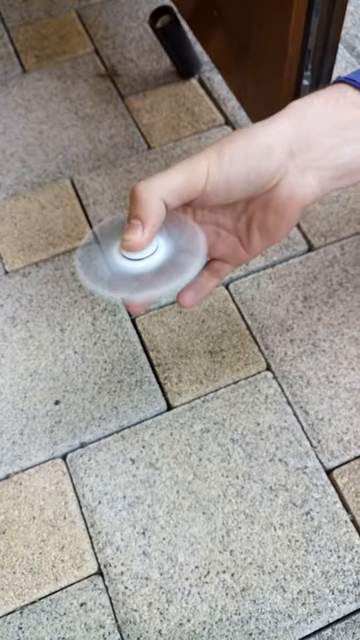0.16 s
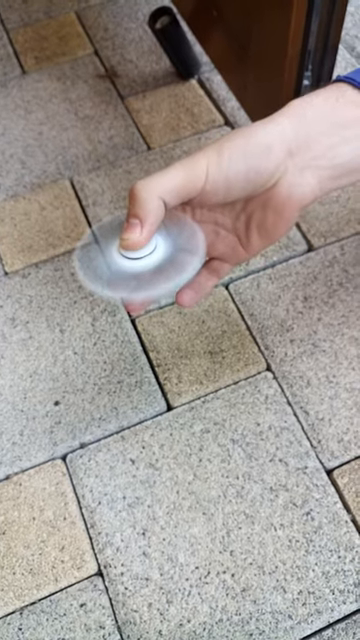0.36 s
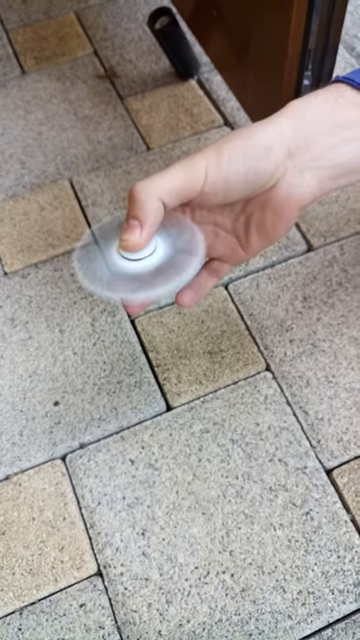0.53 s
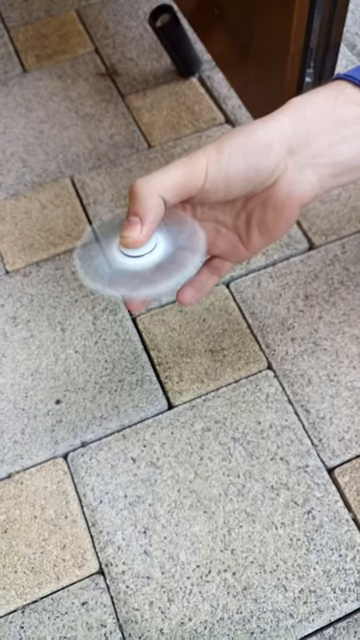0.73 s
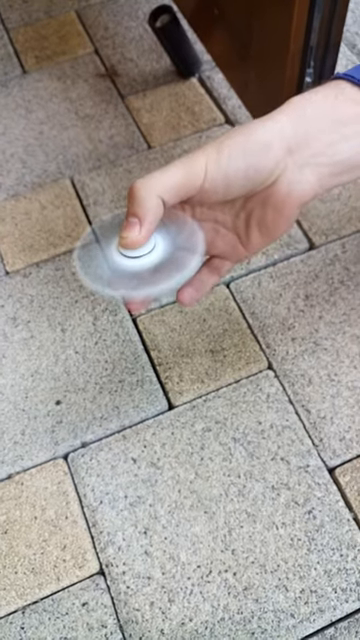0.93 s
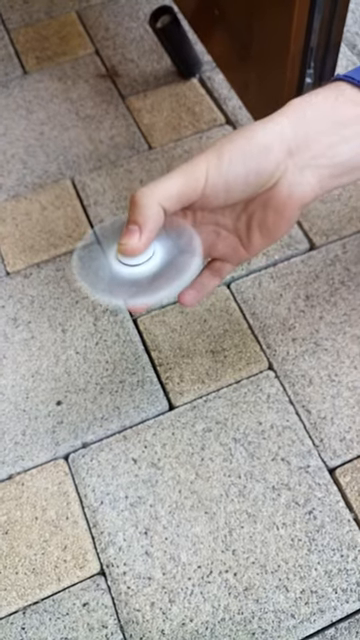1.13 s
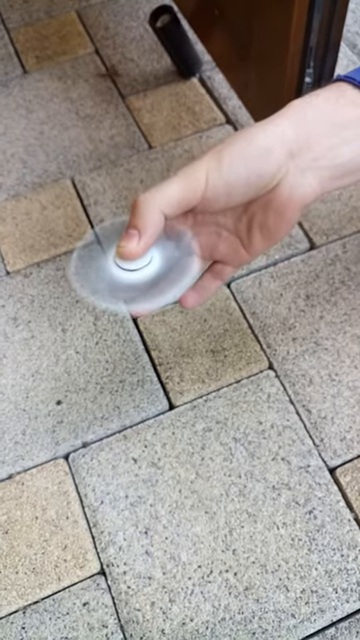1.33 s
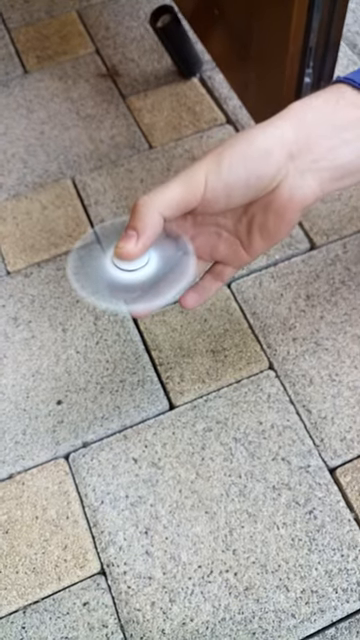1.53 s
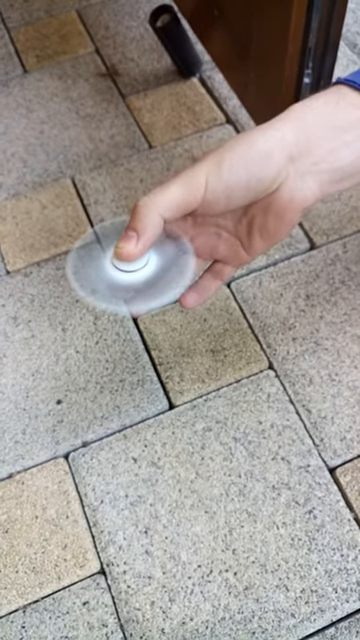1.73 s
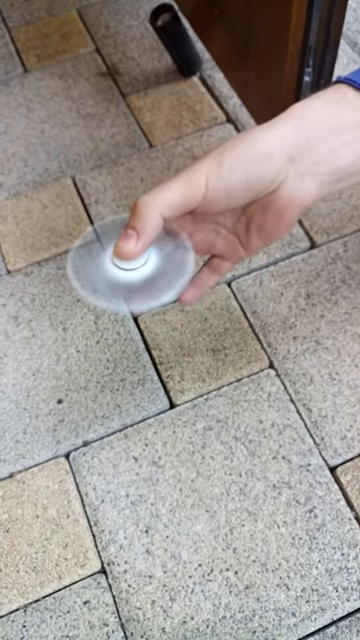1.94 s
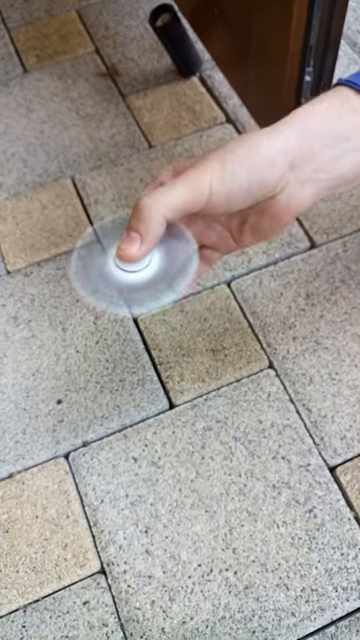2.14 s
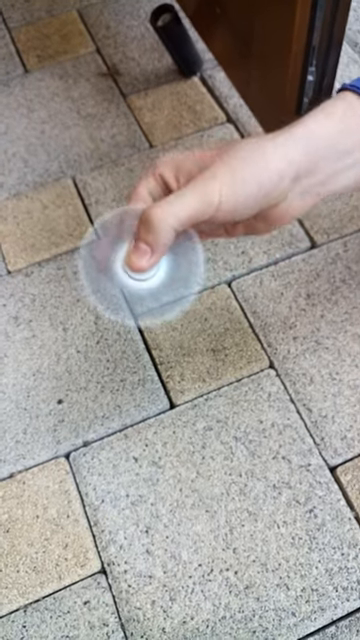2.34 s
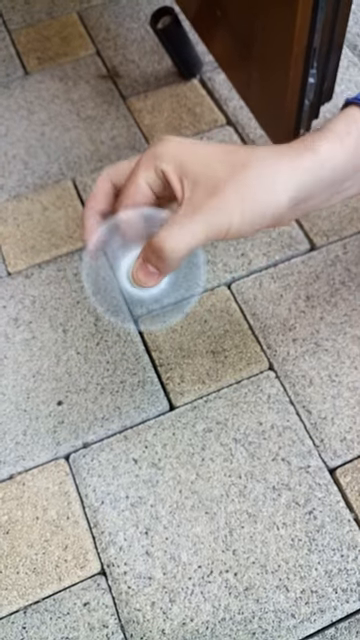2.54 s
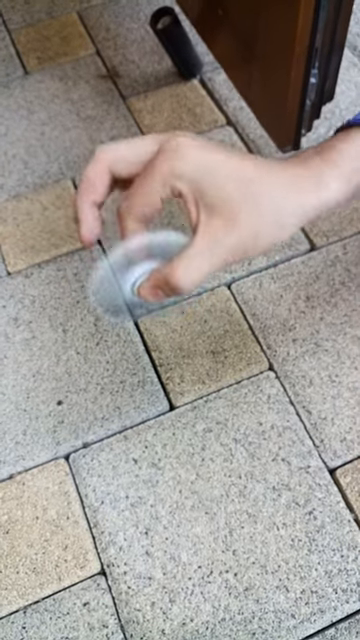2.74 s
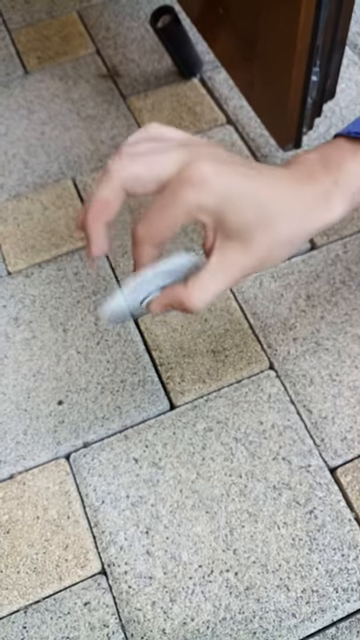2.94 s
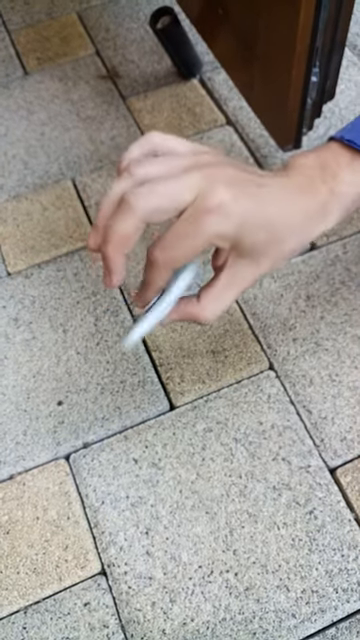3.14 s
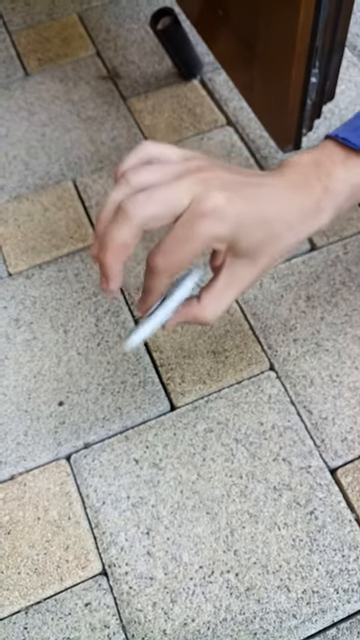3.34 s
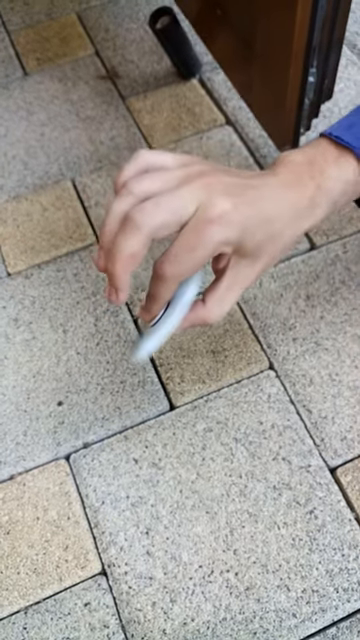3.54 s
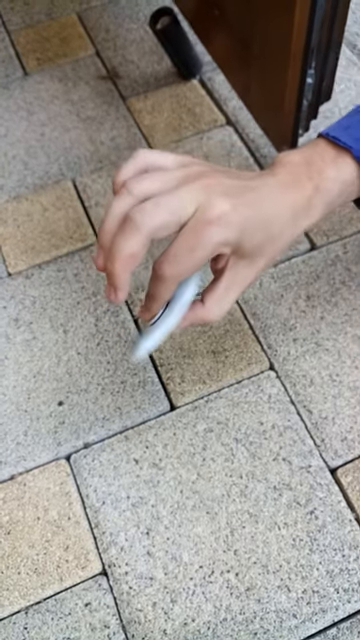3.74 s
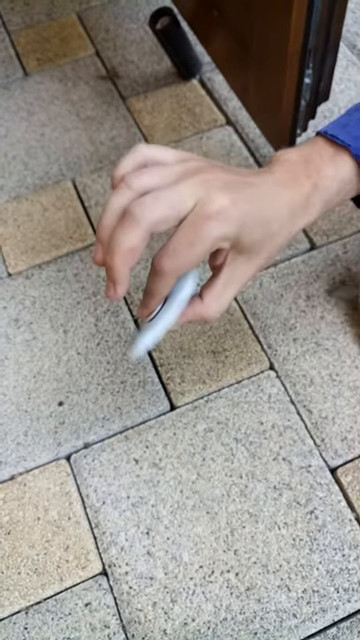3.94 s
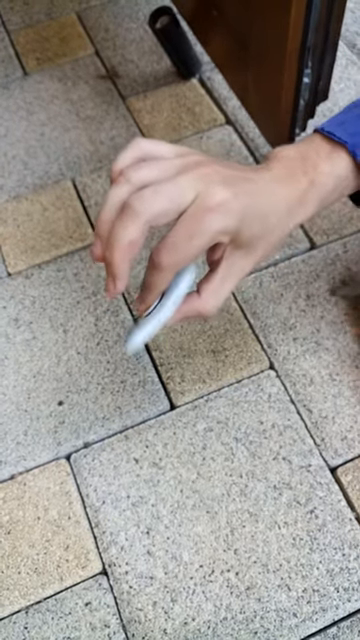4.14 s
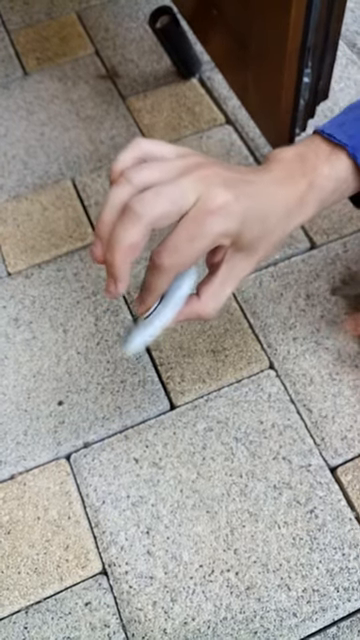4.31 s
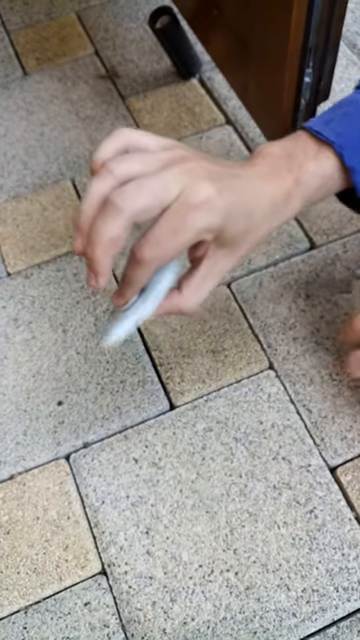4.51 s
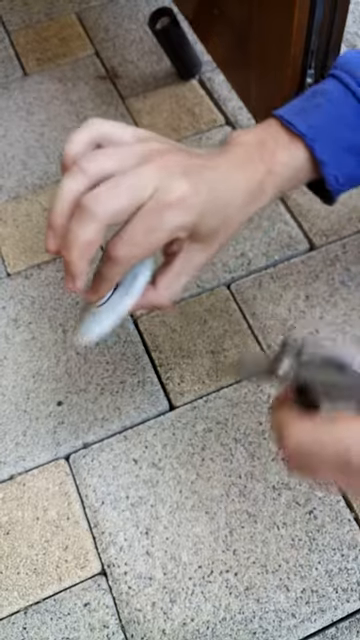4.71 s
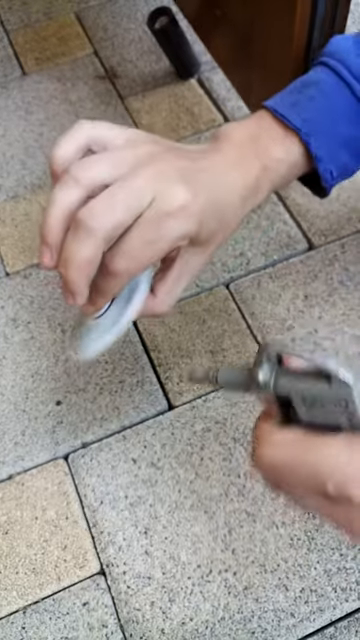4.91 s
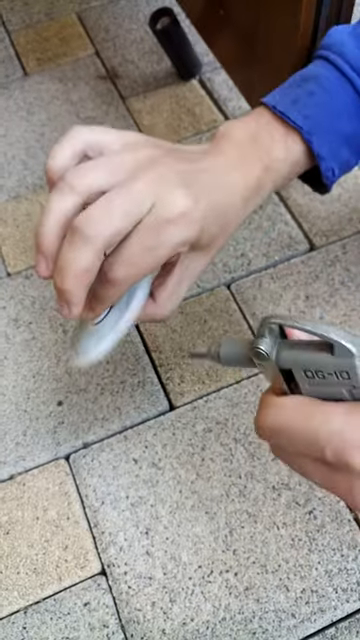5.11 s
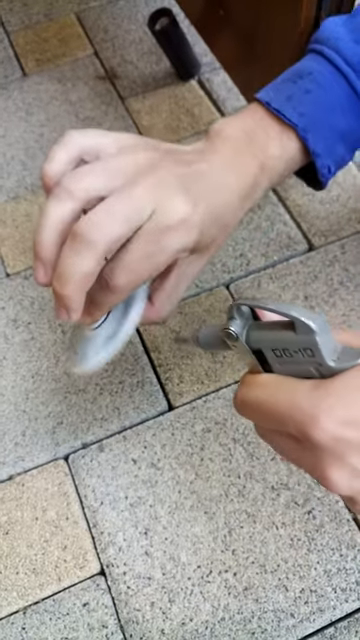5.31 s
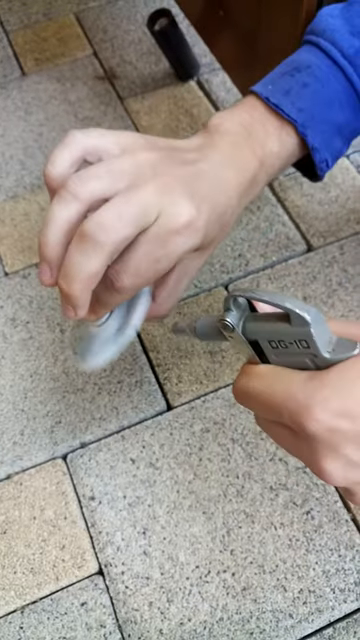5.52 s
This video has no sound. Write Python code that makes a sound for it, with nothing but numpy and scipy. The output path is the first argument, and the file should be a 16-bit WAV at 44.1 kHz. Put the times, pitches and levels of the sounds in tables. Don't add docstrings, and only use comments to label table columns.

```python
import sys
import numpy as np
from scipy import signal
from scipy.fft import rfft, irfft, next_fast_len
from scipy.io import wavfile
from scipy.ndimage import uniform_filter1d, minimum_filter1d

SR = 44100
rng = np.random.default_rng(int(sys.argv[2]) if len(sys.argv) > 2 else 0)


def rack_gain(trim_db):
    fader = np.asarray(trim_db, float)
    return 10 ** (fader / 20)


def to_wav(sig):
    pcm = np.clip(np.atleast_2d(sig), -1, 1) * 32767
    pcm = np.round(pcm).astype(np.int16)
    wavfile.write(sys.argv[1], SR, pcm.T)


N = 245637
T = np.arange(N) / SR
SIZE = next_fast_len(N)
HZ = np.maximum(np.arange(SIZE // 2 + 1) * SR / SIZE, 1)


def spinner():
    # (frequency [Hz], left [dB per Hz], right [dB per Hz])
    flat_colour = [(248, 0, -6), (490, -13.5, -12.5), (990, -25, -25), (1377, -21, -29), (2343, -14, -17),
                   (3220, -6.5, -16.5), (3690, -6, -10.5), (4500, 2, -13.5), (6160, -6.5, -8),
                   (6700, -5, -7.5), (8000, -3.5, -11.5), (10500, -8, -9.5), (12400, -12, -6.5),
                   (14500, -7.5, -7)]
    # (frequency [Hz], left [dB per Hz], right [dB per Hz])
    upright_colour = [(232, -2, -7), (472, -15.5, -14.5), (1020, -25, -25), (1360, -21, -36.5),
                      (2330, -15.5, -17.5), (3220, -7.5, -14), (3980, -1.5, -13), (4520, 1, -14.5),
                      (5870, -3.5, -10.5), (6700, -9, -14.5), (7800, -7, -14.5), (9900, -9.5, -14.5),
                      (12900, -14, -10.5), (14700, -9, -10)]
    # (frequency [Hz], flat [0-1], upright [0-1])
    likeness = [(507, 0.46, 0.44), (1010, 0.03, 0), (1990, 0.11, 1), (2750, 0.6, 0.06), (3500, 0.53, 0.2),
                (4060, 0, 0.38), (5470, 0.37, 0), (7500, 0, 0.6), (8100, 0.3, 0.12), (9300, 0.4, 0.07),
                (11300, 0.16, 0.23), (13000, 0, .15), (14800, 0, 0), (15500, 0.04, 0.3)]
    # (time [s], speed [turns per s])
    turns_hz = [(0, 48.45), (5.57, 35.4)]
    # (time [s], swell [dB], half length [s])
    regrips = [
        (1.55, 0.9, 0.094),
        (2.6, 1.5, 0.49),
        (3.15, 2, 0.12),
    ]

    start_db, run_down_db_per_s, turned_away_db = -30, 0.5244, 1.5
    tilt = step(2.44, 0.51)
    shaded = step(3.67, 0.41)
    hiss_db = start_db - run_down_db_per_s * T - turned_away_db * shaded + bumps(regrips)

    throb_db, wobble = 0.87, 0.022
    turn = 2 * np.pi * np.cumsum(in_time(turns_hz)[0] * (1 + wobble * drift(3.4))) / SR
    impacts = rack_gain(2.03 * rng.exponential(1, N) + throb_db * np.sin(turn))

    flat_alike, upright_alike = at_hz(likeness)
    flat_db = at_hz(flat_colour) + peaks(2) + no_bass(313)
    upright_db = at_hz(upright_colour) + peaks(3) + no_bass(400)
    flat = hiss(flat_db, flat_alike, 8 / SR, flicker_db=0.08, patchy_db=1.0, gate=impacts)
    upright = hiss(upright_db, upright_alike, 4.6 / SR, flicker_db=0.91, patchy_db=.9, gate=impacts)
    return rack_gain(hiss_db) * (np.sqrt(1 - tilt) * flat + np.sqrt(tilt) * upright)


def peaks(column):
    # (frequency [Hz], width [Hz], flat [dB], upright [dB])
    race = [(846, 70, 7.5, 8.5), (2183, 99, 1, 6), (3310, 580, 1.5, 2), (4560, 480, 1, 2.5),
            (4910, 300, 3.5, 3.5), (5250, 370, 1.5, 1.5), (6600, 160, 3.5, 6.5), (7200, 200, -2.5, 5.5),
            (7740, 200, -4.5, 3), (8470, 430, 4, -2.5), (8800, 150, 0.5, -8), (15520, 1360, 10.5, 10)]
    return sum(row[column] * resonance(row[0], row[1]) for row in race)


def blow_gun():
    # (frequency [Hz], left [dB per Hz], right [dB per Hz])
    nozzle_colour = [(250, -22.5, -28), (500, -24.5, -22), (990, -24, -23), (1490, -23.5, -28),
                     (2320, -20, -20), (3220, -10.5, -22), (3900, -9.5, -17.5), (4850, -3, -19),
                     (5700, -9, -16.5), (6700, -7.5, -10), (8000, -11, -19), (9900, -10, -15.5),
                     (12760, -14.5, -9.5), (14800, -1.5, -1.5)]
    # (frequency [Hz], left [dB per Hz], right [dB per Hz])
    roar_colour = [(250, -14.5, -18.5), (500, -15.5, -20), (980, -13, -17.5), (1390, -14.5, -18.5),
                   (2250, -8, -13.5), (3270, -6, -8), (3830, -2.5, -9.5), (4600, 2.5, -11.5),
                   (5940, -4.5, -7), (6700, -10, -12.5), (7700, -13.5, -12), (9900, -13.5, -16.5),
                   (14200, -13.5, -13), (15640, -3.5, -4.5)]
    # (frequency [Hz], width [Hz], depth [dB])
    shadows = [(3700, 243, -3.3), (8200, 400, -3.5), (9160, 320, -4.5), (15300, 570, 0.5)]
    # (time [s], change [dB], half length [s])
    strays = [
        (5.17, 1, 0.012),
        (5.25, -1, 0.045),
        (5.44, -2.5, .03),
    ]

    valve_s, valve_open_s = 4.9678, .0018
    since = np.maximum(T - valve_s, 0)
    opened = (1 - np.exp(-since / valve_open_s)) ** 2

    squeeze_db_per_s, pop_db, pop_s = 6, 3.5, .012
    nozzle_db = -14.2 + squeeze_db_per_s * since + pop_db * np.exp(-since / pop_s)
    miss_db, aim_s = -38, .082
    roar_db = -9.2 + miss_db * np.exp(-since / aim_s) + bumps(strays)

    path_db = no_bass(95.6) + sum(db * resonance(hz, width) for hz, width, db in shadows)
    alike = 0.084 + 0.061 * np.cos(2 * np.pi * HZ / 1750)
    nozzle = hiss(at_hz(nozzle_colour) + path_db, alike, 7 / SR, flicker_db=0.4, patchy_db=-0.3)
    churning = rack_gain(1.06 * drift(150))
    roar = hiss(at_hz(roar_colour) + path_db, alike, 7 / SR, flicker_db=-0.3, patchy_db=.8, gate=churning)
    return opened * (rack_gain(nozzle_db) * nozzle + rack_gain(roar_db) * roar)


def handling():
    # (time [s], peak [dB], ring [Hz], left minus right [dB])
    ticks = [(2.59, -30, 6700, 10), (3.14, -23, 8200, 15), (3.8953, -22, 6000, -3), (3.902, -24, 6400, 15),
             (3.9048, -21, 6600, 12), (3.907, -23, 6600, 9), (3.9106, -20.5, 4730, 11),
             (3.9143, -19, 7100, 6), (3.9555, -22, 6000, 15), (3.959, -25, 4940, 0),
             (3.9657, -19.5, 7300, 8), (4.025, -25, 4480, 4), (4.5538, -14.5, 6370, 7),
             (4.553, -16, 12300, 2), (4.561, -28, 7000, 3), (4.578, -27, 6500, 5)]
    # (time [s], level [dB], half length [s])
    rustles = [
        (3.245, -49, 0.045),
        (3.9105, -33, 0.0015),
        (3.912, -45, 0.018),
        (3.958, -47, 0.01),
        (4.555, -44, .002),
        (4.75, -56, 0.3),
    ]
    tick_t60_s, echo_t60_s, length = 0.012, 0.042, 4000
    out, since = np.zeros((2, N + length)), np.arange(length) / SR
    for s, db, hz, pan_db in ticks:
        tick = rng.standard_normal((2, length)) * rack_gain(-60 * since / (0.51 * tick_t60_s) - 2)
        rings = np.sin(2 * np.pi * hz * since) + np.sin(2 * np.pi * 4600 * since)
        tick += 0.49 * rings * rack_gain(-60 * since / tick_t60_s)
        echo = signal.lfilter([1, 0, -1], [1, -1.0, .6], rng.standard_normal((2, length)))
        tick += echo * rack_gain(-23.5 - 60 * since / echo_t60_s)
        start = round(s * SR)
        out[:, start:start + length] += tick * rack_gain([[db + pan_db / 2], [db - pan_db / 2]])
    small_parts = signal.butter(3, 2600, "high", fs=SR, output="sos")
    out = signal.sosfilt(small_parts, out[:, :N])
    cloth = signal.butter(1, [400, 2600], "band", fs=SR, output="sos")
    rub = signal.sosfilt(cloth, rng.standard_normal((2, N)))
    return out + rms_one(rub) * bumps([(s, rack_gain(db), half) for s, db, half in rustles])


def breeze():
    # (frequency [Hz], level [dB per Hz])
    rumble_colour = [(44, -36), (75, -14.5), (119, -0.5), (140, 2), (200, -6), (248, -19), (302, -15),
                     (415, -30.5), (500, -26.5), (700, -31), (910, -40), (1540, -120)]
    # (frequency [Hz], level [dB per Hz])
    deep_colour = [(8.8, -41), (15, -21), (38, -6), (81, 0), (95, -7), (120, 7), (210, -120)]
    # (time [s], level [dB])
    heaves = [
        (.4, -40),
        (.9, -51),
        (1.12, -45),
        (1.57, -46),
        (1.8, -49),
        (2.19, -42),
        (3.21, -44),
        (3.72, -53),
        (4.38, -51),
        (5.05, -50),
    ]
    # (time [s], peak [dB], ring [Hz])
    thuds = [(0.082, -31, 128), (0.145, -30, 123), (0.586, -33, 124), (0.726, -23, 141),
             (1.014, -23.5, 185), (1.161, -25.5, 136), (1.357, -27.5, 169), (1.518, -36, 110),
             (1.8, -27, 150), (1.902, -27, 140), (2.163, -15, 133), (2.249, -21.5, 136),
             (2.378, -21.5, 130), (2.556, -45, 145), (2.981, -31.5, 170), (3.011, -34, 144),
             (3.084, -24.5, 134), (3.126, -29, 180), (3.71, -23.5, 133), (3.787, -29, 140),
             (3.87, -32.5, 143), (4.049, -38, 132), (4.287, -23, 162), (4.463, -29, 133)]

    rumble_db = gusts_db()
    deep = rack_gain(-46 - 1.5 * T + 0.45 * (rumble_db - rumble_db.mean()))
    deep = deep + bumps([(s, rack_gain(db), 0.046) for s, db in heaves])
    out = rack_gain(rumble_db) * hiss(at_hz(rumble_colour), .96, 0, flicker_db=.8, patchy_db=.8)
    out += deep * hiss(at_hz(deep_colour), .93, 0, flicker_db=.8, patchy_db=.8)
    half_s = 0.0109
    for s, db, hz in thuds:
        near = slice(max(round((s - .05) * SR), 0), round((s + .1) * SR))
        since = T[near] - s - 1.545 * half_s
        out[:, near] += rack_gain(db) * np.exp(-(since / half_s) ** 2) * np.cos(2 * np.pi * hz * since)
    return out


def gusts_db():
    # (time [s], level [dB])
    calm = [
        (0, -36),
        (1.3, -39),
        (3.4, -43),
        (4.0, -42),
        (4.98, -39),
        (5.08, -55),
        (5.57, -38),
    ]
    # (time [s], peak [dB], rise [s])
    gusts = [(.8, -30, .15), (1.08, -33.5, 0.15), (1.82, -35.5, 0.049), (2.45, -33.5, 0.12),
             (2.75, -42, .1), (3.1, -43, 0.15), (3.72, -39, .04), (3.85, -36.5, 0.085), (4.3, -31.5, .03),
             (4.379, -38.5, .05), (4.73, -47, .05)]
    dies_db_per_s = 56
    power = rack_gain(2 * in_time(calm)[0])
    for s, db, rise in gusts:
        below_peak_db = np.where(T < s, 10 * (s - T) / rise, dies_db_per_s * (T - s))
        power = power + rack_gain(2 * (db - below_peak_db))
    return 10 * np.log10(power)


def hiss(colour_db, alike, lag_s, flicker_db, patchy_db, gate=1):
    shared, *own = rfft(gate * rng.standard_normal((3, N)), SIZE)
    alike = np.clip(alike, 0, 1)
    late = np.array([np.exp(-2j * np.pi * HZ * lag_s), np.ones(len(HZ))])
    sides = np.sqrt(alike) * shared * late + np.sqrt(1 - alike) * np.array(own)
    sides = sides * rack_gain(colour_db)
    together_db = flicker_db * (.5 * drift(3.2) + drift(43))
    out = 0
    for centre in np.arange(4, 14.5):
        share = np.clip(1 - np.abs(np.log2(HZ) - centre), 0, 1)
        if np.max(colour_db[:, share > .3]) > -45:
            out = out + irfft(sides * share, SIZE)[:, :N] * rack_gain(together_db + patchy_db * drift(6.7))
    return out / np.sqrt(np.mean(np.mean(out, axis=0) ** 2))


def drift(rate):
    r = np.exp(-80 * np.pi * rate / SR)
    slow = signal.lfilter([1], [1, -2 * r, r * r], rng.standard_normal(N // 40 + 2002))[2000:]
    return np.interp(np.arange(N) / 40, np.arange(len(slow)), rms_one(slow))


def resonance(hz, width):
    return 1 / (1 + (2 * (HZ - hz) / width) ** 2)


def no_bass(hz):
    return -20 * np.log10(1 + (hz / HZ) ** 2)


def bumps(rows):
    return sum(height * np.exp(-((T - s) / half) ** 2) for s, height, half in rows)


def step(s, length):
    return .5 + .5 * np.tanh((T - s) / length)


def in_time(rows):
    s, *columns = np.transpose(rows)
    return [np.interp(T, s, c) for c in columns]


def at_hz(points):
    hz, *columns = np.transpose(points)
    return np.array([np.interp(np.log(HZ), np.log(hz), c) for c in columns])


def rms_one(x):
    return x / np.sqrt(np.mean(x ** 2) + 1e-20)


def scene():
    # (time [s], gain [dB])
    duck = [
        (4.959, 0),
        (4.9645, -16),
        (4.97, -16),
        (5.0, -1),
    ]
    background = spinner() + handling() + breeze()
    return background * rack_gain(in_time(duck)[0]) + blow_gun()


def starve(x, margins, follow):
    hz, _, spec = signal.stft(x, SR, "hann", 2048, 1024)
    power = (np.abs(spec[:, :1020]) ** 2).reshape(2, 170, 6, -1).mean(axis=2)
    level_db = 10 * np.log10(uniform_filter1d(power, 2, axis=2)[:, :120] + 1e-16)
    both_db = .55 * level_db + .45 * level_db[::-1]
    around_db = uniform_filter1d(both_db, 51, axis=1, mode="nearest")
    around_db = uniform_filter1d(around_db, 3, axis=2)
    margin_db = np.interp(hz[3:720:6], *np.transpose(margins))[:, None]
    louder_db = follow * (around_db.mean(axis=1, keepdims=True) - np.median(around_db))
    mood_db = 4 * uniform_filter1d(rng.standard_normal(level_db.shape), 3, axis=2)
    kept = 1. * (level_db > around_db + margin_db + louder_db + mood_db)
    spec[:, :720] *= np.repeat(minimum_filter1d(kept, 2, axis=2), 6, axis=1)
    return signal.istft(spec, SR, "hann", 2048, 1024)[1][:, :N]


def low_pass(x):
    return signal.sosfilt(signal.butter(12, 15510, fs=SR, output="sos"), x)


def record(dry):
    # (frequency [Hz], margin [dB])
    side_margins = [(900, -40), (1300, -28), (2000, -18), (2600, -11), (3300, -7.5), (5000, -7),
                    (7500, -8.5), (8700, -11.5), (10500, -8.5), (12500, -11)]
    # (frequency [Hz], margin [dB])
    sum_margins = [(900, -36), (1300, -19), (2000, -14), (2400, -8.5), (2700, -6), (3000, -7.5), (3600, -8),
                   (6000, -8), (7500, -8), (8700, -8), (10500, -5.7), (12500, -11)]
    rounded = dry / (1 + (dry / 1.1) ** 6) ** (1 / 6)
    port_hz, port_db, top_hz = 14600, 1.5, 15510
    lift = rack_gain(port_db / (1 + (port_hz / HZ) ** 60)) * np.where(HZ < top_hz, 1, .02)
    coloured = irfft(rfft(rounded, SIZE) * lift, SIZE)[:, :N]
    left, right = starve(coloured, side_margins, follow=.1)
    mid, side = starve(np.array([left + right, left - right]) / 2, sum_margins, follow=.17)
    return low_pass(np.array([mid + side, mid - side]))


dry = scene()
out = record(dry)
to_wav(out)
```